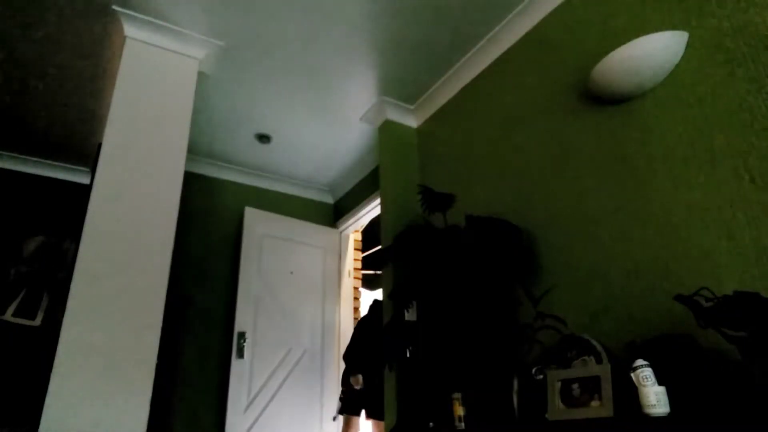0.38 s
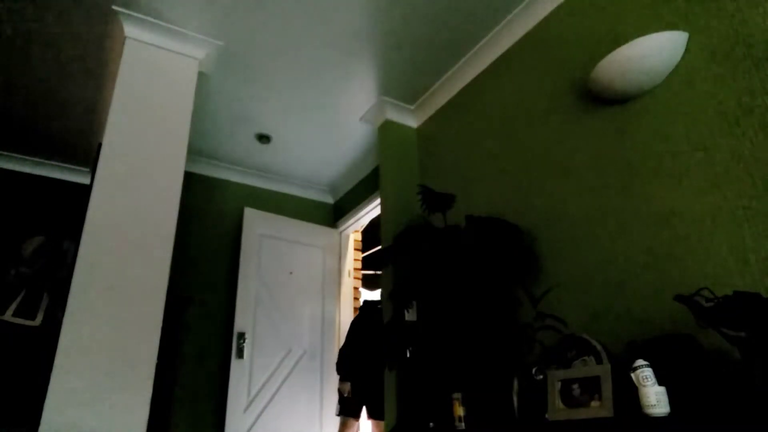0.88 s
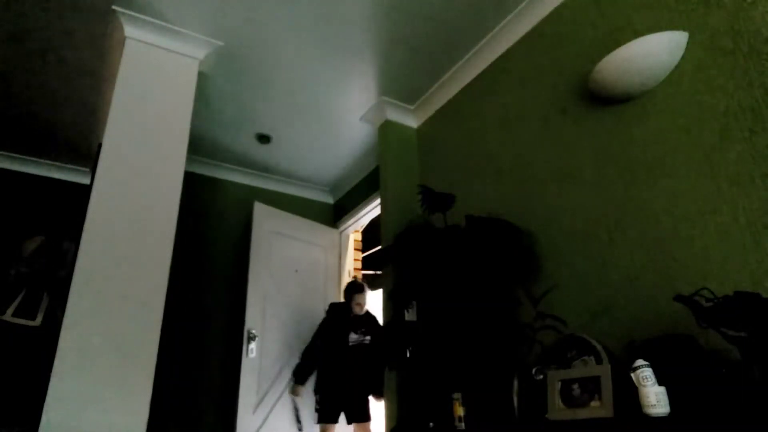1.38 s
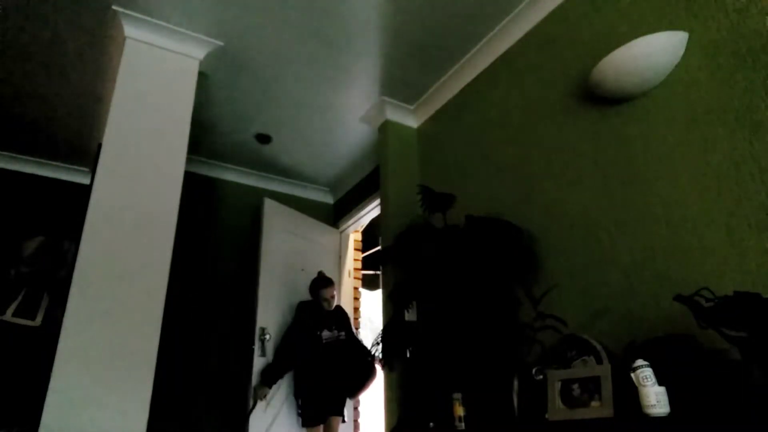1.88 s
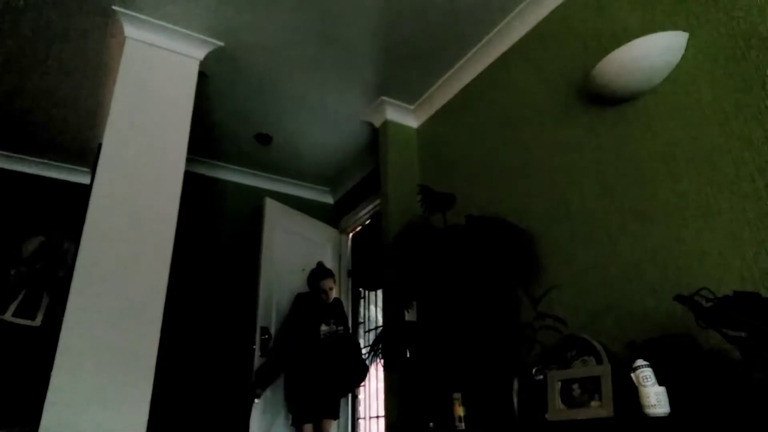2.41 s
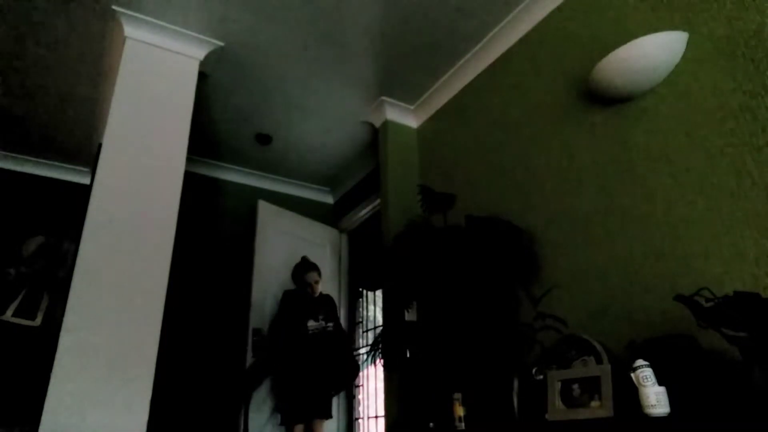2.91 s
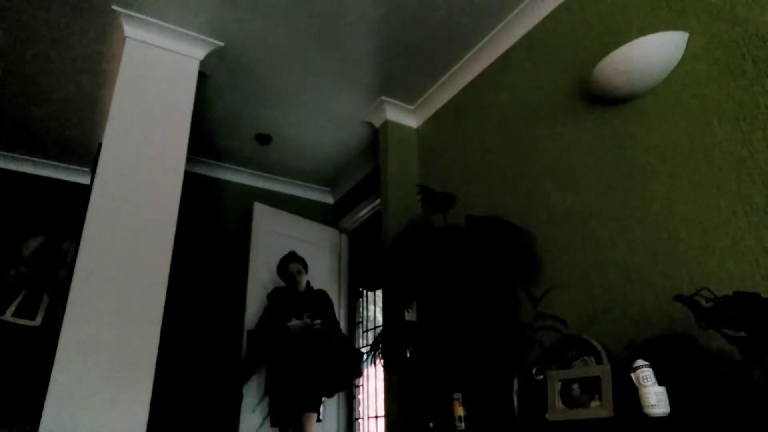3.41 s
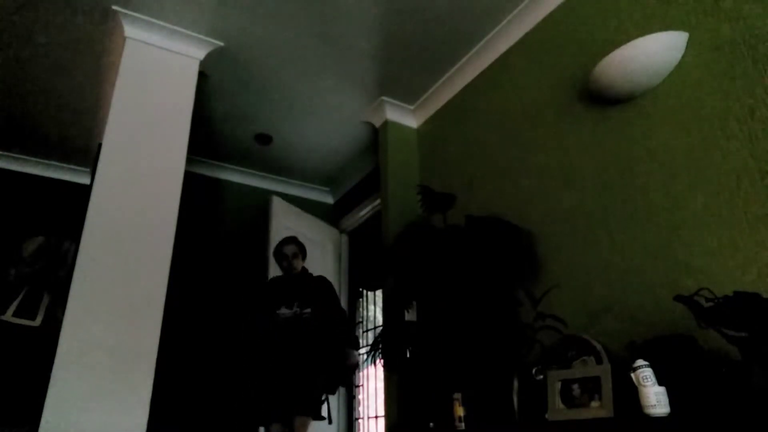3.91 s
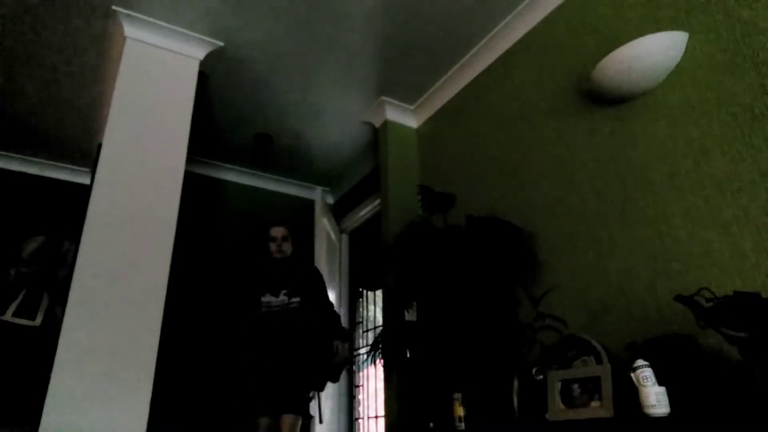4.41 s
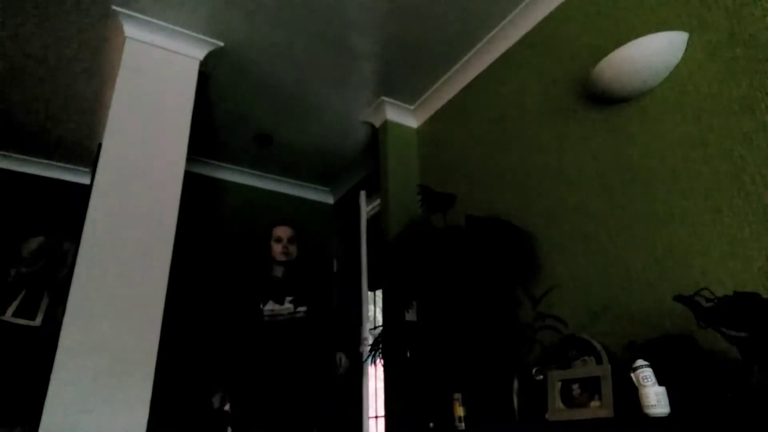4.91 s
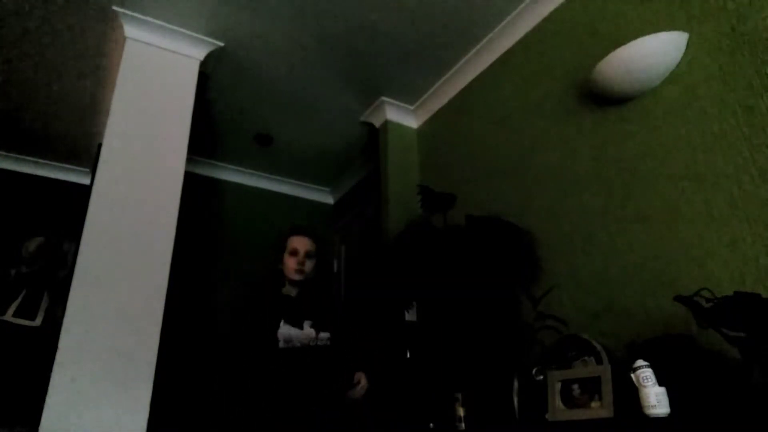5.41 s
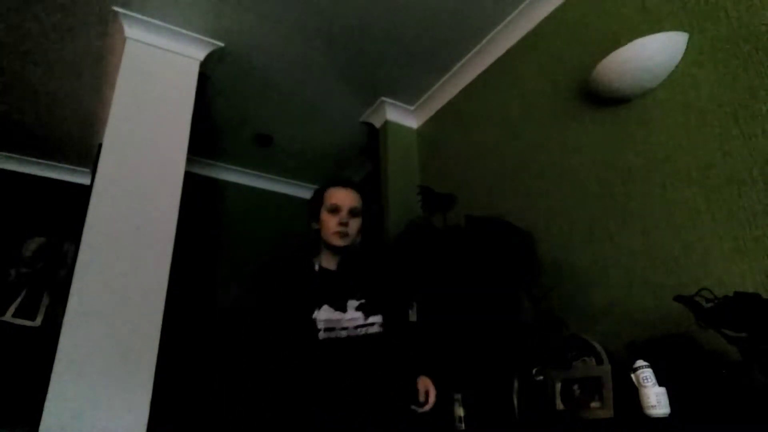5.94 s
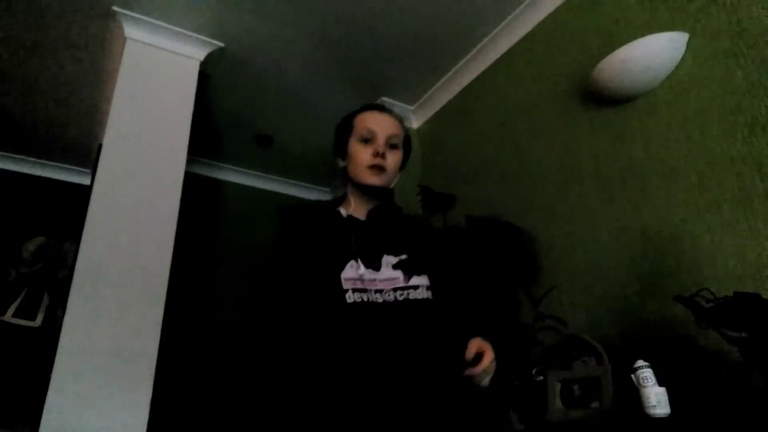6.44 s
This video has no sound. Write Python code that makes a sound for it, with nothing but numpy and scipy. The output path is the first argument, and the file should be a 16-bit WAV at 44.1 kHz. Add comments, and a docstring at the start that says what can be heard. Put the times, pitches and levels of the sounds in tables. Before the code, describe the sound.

In a hard-walled room, a wooden door bumps, its hinge squeaks, a light metal screen claps and rattles, then a heavy door slam and soft footsteps.

```python
"""A wooden front door heard indoors: blows ring its panel modes, an early bump and later two slams.
A hinge squeaks by stick-slip; a light screen door claps in its metal frame and rattles on as uneven taps.
Keys and latch click with metal resonances, soft soles thump, clothes and shoes rub, street rumble and hiss lie under.
Decaying noise gives each hit a hard room; the recorder's noise suppressor passes low rumble and cuts tails short."""
import sys
import numpy as np
from scipy import signal
from scipy.fft import rfft, irfft, next_fast_len
from scipy.io import wavfile
from scipy.ndimage import uniform_filter1d, map_coordinates

SR = 44100
rng = np.random.default_rng(int(sys.argv[2]) if len(sys.argv) > 2 else 0)


def dump_mix(stems):
    """Bounce the given channels to the path in sys.argv[1] as a 16-bit WAV at rate SR."""
    frames = np.atleast_2d(stems).T  # one column per channel
    limited = np.clip(frames, -1, 1)  # hard clip at full scale
    pcm = np.round(limited * 32767).astype(np.int16)
    wavfile.write(sys.argv[1], SR, pcm)


def voltage_ratio(level):
    """Linear amplitude factor for a level in decibels (scalar or array-like)."""
    return 10 ** (np.asarray(level, float) / 20)


N = 289296

# edges of the five bands that colour door, screen and foot hits: [Hz]
HIT_BANDS_HZ = [40, 160, 500, 1600, 5000, 15000]
# share of the room's t60 heard after each kind of source
DOOR_ECHO, SCREEN_ECHO, CLICK_ECHO, STEP_ECHO = 0.72, 1, 0.69, 0.6


def unit(x):
    """Scale to rms 1."""
    return x / np.sqrt(np.mean(x ** 2) + 1e-20)


def along(points, hz):
    """Interpolate (Hz, value) points on a log frequency axis."""
    f, v = np.transpose(points)
    return np.interp(np.log(hz + 1), np.log(f + 1), v)


def filtered(x, response):
    """Filter x by a complex response of frequency."""
    m = next_fast_len(len(x) + 8192)
    hz = np.fft.rfftfreq(m, 1 / SR)
    return irfft(rfft(x, m) * response(hz), m)[:len(x)]


def causal(gain):
    """Minimum-phase response with this gain, by folding the cepstrum."""
    cepstrum = irfft(np.log(gain + 1e-6))
    half = len(cepstrum) // 2
    cepstrum[1:half] *= 2
    cepstrum[half + 1:] = 0
    return np.exp(rfft(cepstrum))


def add(track, start_s, x):
    """Mix x into track from start_s."""
    part = track[round(start_s * SR):][:len(x)]
    part += x[:len(part)]


def room(echo, build_s, early_db=5, early_s=0.055):
    """Fresh room answer: noise that builds up, an early part that fades first, a tail that dies by frequency."""
    # room decay before scaling by echo: (frequency [Hz], t60 [s])
    decay = [(60, 1.66), (300, 1.34), (800, 1.052), (3000, 1.19), (7000, 1.174), (12000, .6)]
    hz, frame_s, z = signal.stft(rng.standard_normal(SR), SR, nperseg=256)
    t60_s = echo * along(decay, hz)[:, None]
    tail = signal.istft(z * voltage_ratio(-60 * frame_s / t60_s), SR, nperseg=256)[1][:SR]
    t = np.arange(SR) / SR
    build = 1 - np.exp(-t / build_s)
    early = 1 + voltage_ratio(early_db) * np.exp(-t / early_s)
    return tail * build * early


def tinted(x, bands_hz, band_db):
    """Filter an even-coloured hit to these band levels, rolled off at both ends."""
    edges = np.array(bands_hz)
    density_db = np.array(band_db) - 10 * np.log10(np.diff(edges) / (SR / 2))
    centres_hz = np.sqrt(edges[1:] * edges[:-1])
    shape = [(20, density_db[0] - 18), *zip(centres_hz, density_db), (16000, density_db[-1] - 21)]
    return filtered(x, lambda hz: causal(voltage_ratio(along(shape, hz))))


def resonant(x, peaks, ring_db):
    """Add second-order resonances to x: peaks are (Hz, width Hz, dB), all shifted by ring_db."""
    def response(f):
        poles = sum(voltage_ratio(db) * 1j * f * w / (c * c - f * f + 1j * f * w) for c, w, db in peaks)
        return 1 + voltage_ratio(ring_db) * poles
    return filtered(x, response)


def air():
    """Street rumble through the doorway and the microphone's own hiss: shaped noise that swells slowly."""
    # noise spectrum: (frequency [Hz], relative density [dB per Hz])
    spectrum = [(20, -28.5), (45, -14), (90, -2.5), (200, -10.5), (450, -17.5), (900, -20), (2500, -39),
                (7000, -32), (11000, -35), (15000, -47)]
    swell = map_coordinates(rng.standard_normal(N // 1000), [np.arange(N) / SR * 5])
    noise = filtered(rng.standard_normal(N), lambda hz: voltage_ratio(along(spectrum, hz)))
    return voltage_ratio(-51.5 + 1.2 * swell) * unit(noise)


def rustle(gain, spectrum, patchy_db):
    """Rubbing noise, uneven in patches of pitch and time."""
    z = signal.stft(rng.standard_normal(N), nperseg=512)[2]
    field = uniform_filter1d(rng.standard_normal(z.shape), size=9, axis=0)
    field = uniform_filter1d(field, size=7, axis=1)
    patches = signal.istft(z * voltage_ratio(patchy_db * unit(field)), nperseg=512)[1][:N]
    return gain * unit(filtered(patches, lambda hz: voltage_ratio(along(spectrum, hz))))


def rubbing():
    """Every move swells and fades; it rustles the clothes and drags the shoes."""
    # the person moves: (middle [s], half length to 1/e [s], clothes [dB], shoes [dB])
    moves = [(.17, 0.055, -63.5, -74), (0.305, .05, -65, -59.5), (0.417, .06, -59.5, -59),
             (0.559, 0.063, -67.5, -70), (1.815, 0.22, -61.5, -59.5), (2.346, 0.41, -63, -59),
             (3.339, 0.37, -75.5, -56), (3.814, 0.15, -70.5, -76.5), (4.088, 0.19, -62, -62),
             (4.614, 0.1, -64.5, -68), (5.117, 0.22, -78, -57), (6.099, 0.24, -58.5, -67),
             (6.529, 0.28, -63, -56.5)]
    # rubbing spectra: (frequency [Hz], relative density [dB per Hz])
    cloth = [(500, -40), (1200, -9.5), (2200, -1), (3500, 0.5), (6000, -5), (11000, -18), (15000, -28)]
    sole_drag = [(150, -31), (350, -3), (650, 4), (1100, -4.5), (2000, -25.5)]
    still_clothes_db, still_shoes_db = -78, -66.5
    middle_s, half_s, clothes_db, shoes_db = np.transpose(moves)
    swells = np.exp(-((np.arange(N)[:, None] / SR - middle_s) / half_s) ** 2)
    clothes = rustle(voltage_ratio(still_clothes_db) + swells @ voltage_ratio(clothes_db), cloth, patchy_db=3.0)
    shoes = rustle(voltage_ratio(still_shoes_db) + swells @ voltage_ratio(shoes_db), sole_drag, patchy_db=2.0)
    return clothes + shoes


def clicks():
    """Keys, latch and handle: each click is a crack in the room with metal resonances standing out of it."""
    # small clicks: (time [s], gain [dB], body [dB], brightness [dB], ring [dB]);
    # body (700-1500 Hz) and brightness (5-8 kHz) are over the 3-5 kHz band
    hits = [(.522, -84.5, -26, 13, 9), (1.357, -58, -4, -11.5, -0.5), (1.7375, -63.5, -18, -3, -15),
            (1.7989, -76, 19.5, -9, 12), (1.8844, -59.5, 4.5, -3.5, -6), (2, -53, -4, -7.5, -10),
            (2.2613, -69, -14, -24, 7), (2.32, -62.5, 6.5, -6, -8), (3.051, -49, -14.5, -12.5, 2.5),
            (3.2095, -49, -7, -1.5, 7.5), (3.932, -62, 2.5, 1, 3.5), (5.024, -55, -13.5, 2.5, -10),
            (5.033, -53.5, -14, 3, -6.5), (6.1596, -77, -8.5, 17.5, -2.1), (6.227, -59.5, -7.5, -1.5, 8.5),
            (6.43, -71, 14, -5.5, 9.5)]
    # metal resonances: (frequency [Hz], width [Hz], level before ring [dB])
    metal = [(2880, 38, -18), (3690, 87, -7.5), (5154, 390, -10.5), (5240, 140, -2.5), (5700, 170, 2.5),
             (6870, 85, -4), (8620, 41, 6), (9070, 28, 5.5), (11200, 84, -3.5), (11700, 53, -1.5)]
    # edges of the click's six bands: [Hz]
    click_bands_hz = [300, 700, 1500, 3000, 5000, 8000, 15000]
    out = np.zeros(N)
    for s, db, body_db, bright_db, ring_db in hits:
        crack = room(CLICK_ECHO, build_s=0.0007, early_db=3.5, early_s=.03)
        crack = resonant(crack, metal, ring_db)
        mid_db = 2.5 + 0.45 * body_db  # mids follow the body
        top_db = -7 + 0.44 * bright_db  # top follows the brightness
        colour_db = [body_db - 14, body_db, mid_db, 0, bright_db, top_db]
        add(out, s - .002, voltage_ratio(db) * tinted(crack, click_bands_hz, colour_db))
    return out


def ring(modes, build_s, blur_hz):
    """Damped modes at new strengths; wandering pitch blurs each into a narrow band."""
    t = np.arange(SR) / SR
    strengths_db = rng.normal(0, 3.2, len(modes))
    knots = rng.standard_normal((len(modes), 128))
    tones = np.zeros(SR)
    for (hz, db, t60_s), strength_db, knot in zip(modes, strengths_db, knots):
        drift = blur_hz * np.cumsum(np.interp(t * 100, np.arange(128), knot)) / SR  # cycles
        tones += voltage_ratio(db + strength_db - 60 * t / t60_s) * np.sin(2 * np.pi * (hz * t + drift))
    return tones * (1 - np.exp(-t / build_s))


def wooden_door():
    """Each blow sounds the room and rings the door panel's modes, both built up over the contact time."""
    # blows: (time [s], gain [dB], boom [dB], crack [dB], contact [s]);
    # boom (40-160 Hz) and crack (1.6-5 kHz) are over the panel's knock (500-1600 Hz)
    blows = [(0.693, -40, -1, -10, 0.006), (0.703, -32.5, -6.5, -3.5, 0.0082),
             (0.745, -30, -4, -13.5, 0.0018), (5.377, -20.5, -0.5, -16.5, 0.0058),
             (5.491, -14.5, -9, -19.5, 0.0045), (5.501, -15, -4.5, -8.5, 0.072),
             (5.844, -49.5, -7.5, -1, 0.0072), (5.883, -55.5, 3, -1, 0.0066)]
    # panel modes: (frequency [Hz], level [dB], t60 [s])
    wood = [(81.9, -4.5, 0.63), (204, -10.5, .35), (221, -5.5, 0.35), (353.3, -15.5, 0.83), (473, -8, 0.76),
            (499.7, -21, 0.402), (668.5, -4.5, 0.21), (759, -1, 0.32), (884, -0.5, 0.14),
            (1001, -15.5, 0.11), (1168, -4, 0.13), (1207, -3, 0.26), (1430, 2.5, 0.18), (1630, -9.5, 0.77)]
    out = np.zeros(N)
    for s, db, boom_db, crack_db, contact_s in blows:
        blow = room(DOOR_ECHO, contact_s) + voltage_ratio(-8.0) * ring(wood, contact_s, blur_hz=9)
        low_mid_db = -6 + 0.63 * boom_db  # low mids share in the boom
        colour_db = [boom_db, low_mid_db, 0, crack_db, crack_db - 9]
        add(out, s - .003, voltage_ratio(db) * tinted(blow, HIT_BANDS_HZ, colour_db))
    return out


def hinge():
    """Stick-slip at an unsteady rate gives wavering overtones, with a scrape gated once a slip."""
    # one list per squeak: (time [s], mean slip rate [Hz], relative level [dB])
    squeaks = [
        [(1.04, 890, -73), (1.1, 835, -59), (1.2, 800, -60.5), (1.25, 830, -58), (1.29, 903, -51.5),
         (1.34, 950, -61), (1.45, 929, -66.5), (1.5, 951, -76.5)],
        [(1.35, 1329, -57.5), (1.4, 1377, -53.5), (1.5, 1411, -49), (1.55, 1430, -56), (1.62, 1437, -67.5),
         (1.72, 1406, -75.5)],
        [(1.42, 1500, -71.5), (1.5, 1562, -49.5), (1.56, 1616, -55.5), (1.65, 1630, -70), (1.72, 1640, -71)],
    ]
    # response of what the hinge hangs on: (frequency [Hz], gain [dB])
    body = [(700, -7.5), (1500, -4), (2600, 0.5), (3300, -9), (5000, -13), (6000, -20.5), (8000, -34.5)]
    dry = np.zeros(N)
    for rows in squeaks:
        s, slip_hz, db = np.transpose(rows)
        t = np.arange(s[0], s[-1], 1 / SR)
        rate_waver, level_waver = [map_coordinates(rng.standard_normal(256), [(t - s[0]) * 90])
                                   for _ in range(2)]
        rate_hz = np.interp(t, s, slip_hz) * (1 + 0.025 * rate_waver)
        phase = 2 * np.pi * np.cumsum(rate_hz) / SR
        slips = sum(np.sin(k * phase) for k in range(1, 7))
        scrape = 0.4 * (1 + np.cos(phase)) * rng.standard_normal(len(t))
        add(dry, s[0], (slips + scrape) * voltage_ratio(np.interp(t, s, db) + 1.5 * level_waver))
    dry = filtered(dry, lambda hz: voltage_ratio(along(body, hz)))
    tail = room(CLICK_ECHO, build_s=0.0062)
    wet = signal.fftconvolve(dry, tail / np.linalg.norm(tail))[:N]
    return voltage_ratio(-5.5) * dry + voltage_ratio(-0.5) * wet


def steps():
    """Soft soles on a hollow floor: slow-building hits, mostly bass."""
    # footfalls: (time [s], thump gain [dB], sole, 160-500 Hz, over the thump [dB])
    footfalls = [(1.798, -53, 2), (2.319, -78, 15), (3.599, -57, 2.7), (3.68, -56, -12), (3.932, -60.5, 4),
                 (4.466, -53, -18), (4.831, -63.5, -5.5), (5.079, -36, -11), (5.168, -61, 14.5),
                 (5.992, -38, -11.5), (6.118, -44, -5), (6.44, -40, -31), (6.53, -36.5, -10.5)]
    out = np.zeros(N)
    for s, db, sole_db in footfalls:
        colour_db = [0, sole_db, sole_db - 8, sole_db - 30, sole_db - 45]
        thump = tinted(room(STEP_ECHO, build_s=0.027), HIT_BANDS_HZ, colour_db)
        add(out, s, voltage_ratio(db) * thump)
    return out


def screen_door():
    """The light screen door meets its frame and bounces; the thin metal frame resonates in each clap."""
    # claps: (time [s], gain [dB], boom, 40-160 Hz, before gain [dB], contact [s])
    claps = [(2.555, -41.5, -29, 0.002), (2.62, -29.5, -4, 0.0023), (2.638, -28, -28, 0.005),
             (2.838, -39.5, -9, 0.002), (2.932, -50.5, -5.5, 0.002)]
    # thin metal frame: (frequency [Hz], width [Hz], relative level [dB])
    frame = [(745, 110, 1), (2900, 500, -1), (3900, 900, 7.5)]
    # colour of the clap in the four upper bands: [dB]
    clap_db = [-10, -9.5, -7, -9]
    out = np.zeros(N)
    for s, db, boom_db, contact_s in claps:
        clap = resonant(room(SCREEN_ECHO, contact_s), frame, ring_db=-5)
        add(out, s - .003, voltage_ratio(db) * tinted(clap, HIT_BANDS_HZ, [boom_db, *clap_db]))
    return out


def rattle(count=14):
    """The screen frame chatters on after the clap: uneven taps that hold, then die away."""
    # colour of a tap in the five hit bands: [dB]
    tap_tint_db = [-4.5, 0, -4.5, 1, -11.5]
    start_s, hold_s, release_s = 2.66, .3, 0.23
    when, size = rng.random((count, 2)).T
    when_s = when * (hold_s + release_s)
    level_db = -43 - 16.5 * np.clip((when_s - hold_s) / release_s, 0, 1)
    taps = np.zeros(N)
    taps[((start_s + when_s) * SR).astype(int)] = voltage_ratio(level_db - 26 * size)
    tap = tinted(room(SCREEN_ECHO, build_s=0.002), HIT_BANDS_HZ, tap_tint_db)
    return signal.fftconvolve(taps, tap)[:N]


def scene():
    """Everything at the one microphone."""
    hits = wooden_door() + screen_door() + rattle() + clicks() + steps()
    return (hits + hinge() + rubbing() + air())[None]


def suppress(x, over_db=5.0, memory=0.907, steep=0.45):
    """Turns down every narrow band whose recent power is near its quietest level; broad onsets open it at once."""
    # lowest gain of the suppressor: (frequency [Hz], gain [dB])
    floor = [(100, -2), (430, -4), (750, -25), (3000, -22), (12000, -24)]
    hz, _, z = signal.stft(np.pad(x, (0, 1024), "reflect"), SR, nperseg=1024, noverlap=768)
    power = np.abs(z) ** 2
    smoothed = signal.lfilter([1 - memory], [1, -memory], power, axis=1)
    onset = 0.55 * uniform_filter1d(power, size=24, axis=0)  # across neighbouring bands
    recent = np.maximum(smoothed, onset)
    noise = np.quantile(uniform_filter1d(power, size=30, axis=1)[:, 8:-8], .1, axis=1)[:, None]
    noise = voltage_ratio(2 * over_db) * uniform_filter1d(noise, size=5, axis=0)
    gain = np.clip(1 - noise / (recent + 1e-20), 0, 1) ** steep
    gain = np.maximum(gain, voltage_ratio(along(floor, hz))[:, None])
    return signal.istft(z * gain, SR, nperseg=1024, noverlap=768)[1][:N]


def top_cut(x):
    """Nothing passes above the cut-off."""
    return signal.sosfilt(signal.butter(12, 15720, fs=SR, output="sos"), x)


def record(dry):
    """Noise suppressor, soft ceiling and band limit."""
    x = suppress(dry[0])
    x = x / (1 + np.abs(x / .99) ** 8) ** (1 / 8)
    mix = filtered(x, lambda hz: hz < 15600)[None]
    return top_cut(mix)


dry = scene()
out = record(dry)
dump_mix(out)
```